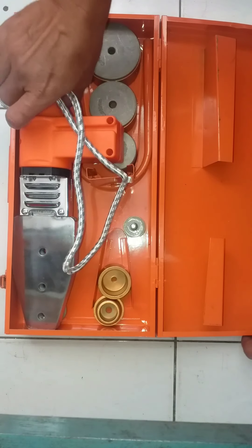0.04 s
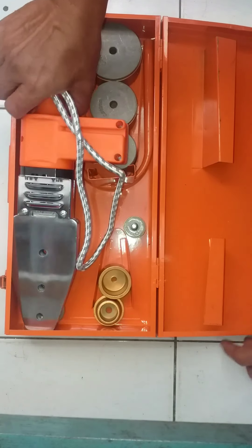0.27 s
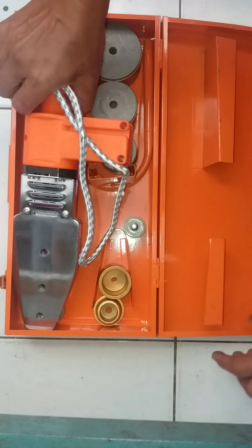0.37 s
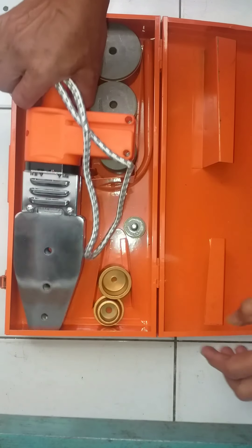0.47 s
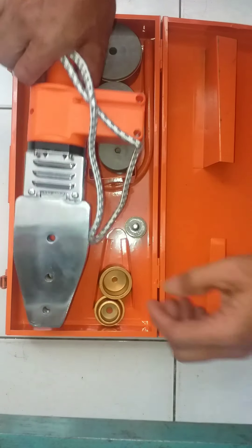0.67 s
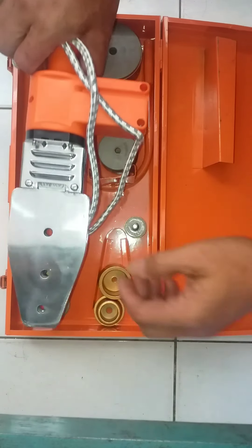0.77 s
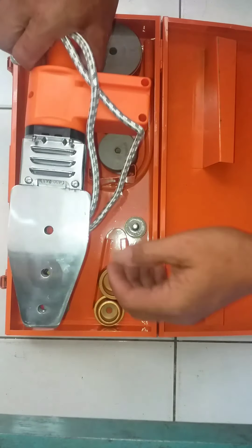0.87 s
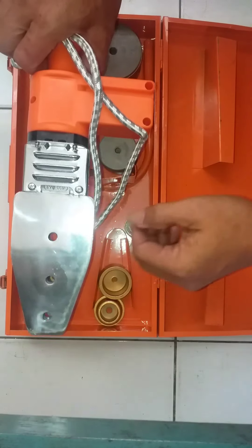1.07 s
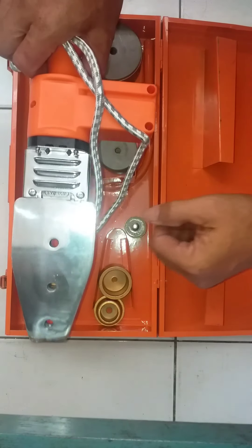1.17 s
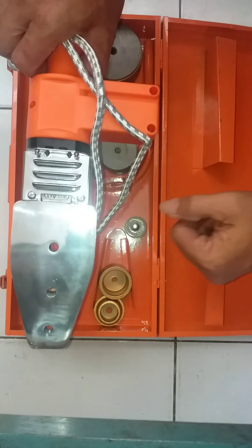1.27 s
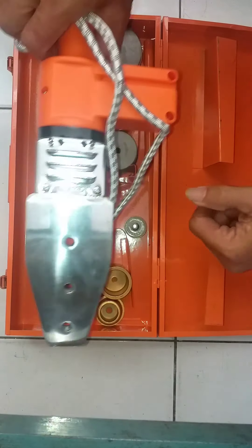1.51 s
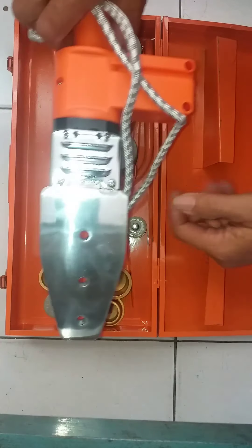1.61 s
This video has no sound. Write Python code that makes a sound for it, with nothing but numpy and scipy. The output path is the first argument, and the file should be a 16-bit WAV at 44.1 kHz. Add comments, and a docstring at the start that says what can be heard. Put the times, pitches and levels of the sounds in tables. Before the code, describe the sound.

Hollow plastic knocks and clatter sound as a metal tool is pulled from its open case in a small tiled room. Small clinks and bumps build to a loud scraping rattle, ending with a light tap over low room noise.

```python
"""A heavy metal tool is lifted out of an open plastic case on a tiled floor, in a small hard room.
Loose metal clinks, the tool bumps the tray, drags against its ribs in a dense clatter and knocks free.
Each knock is a contact crack, the clack of thin panels and the hollow ring of the shell.
A light double tap on the plastic comes last, over a steady low background."""
import sys
import numpy as np
from scipy import signal
from scipy.fft import rfft, irfft
from scipy.io import wavfile
from scipy.ndimage import uniform_filter1d

SR = 44100
rng = np.random.default_rng(int(sys.argv[2]) if len(sys.argv) > 2 else 0)


def pcm_store(signal):
    """Save signal as 16-bit PCM."""
    levels = np.round(np.clip(np.atleast_2d(signal), -1, 1) * 32767)
    wavfile.write(sys.argv[1], SR, levels.astype(np.int16).T)


N = 72765
HIT_SAMPLES = 2 ** 14
PANEL_ATTACK_S, CRACK_ATTACK_S = 0.0025, 0.00024

# knocks of the tool on the case: start_s, clack_db, clack_tilt_db_per_octave, shell_db, crack_db
KNOCKS = [(.1545, -25, 0, -48, -35), (.2265, -35, 5, -32, -21.5), (.2295, -23, -1.5, -34, -46),
          (.2407, -24.5, 3, -57, -25), (.252, -23.5, -4, -33, -34), (.270, -24.5, 3.5, -62, -24),
          (.363, -34, -7, -50, -51), (.4138, -39, 1.5, -38.5, -54), (.440, -34.5, -15, -40.5, -59),
          (0.4605, -19.5, 0.5, -35.5, -47), (.471, -18.5, -1, -30, -53), (0.4935, -18, 1, -32, -41),
          (.515, -19.5, -2, -25, -17), (.5255, -16, 2.5, -23, -19), (.5395, -15, -5, -21, -15),
          (0.5537, -10, -4.5, -24, -12.5), (.559, -17, 0.5, -28, -13.5), (.575, -11, 1.5, -19.5, -22),
          (.589, -15.5, -3, -21.5, -32), (.611, -18, -1, -37, -24), (.620, -15.5, -4, -22, -15),
          (.627, -8.5, 2, -23, -11.5), (.637, -26, -1, -25.5, -32), (.658, -23, -6, -42.5, -49),
          (.685, -34, -3, -39, -45), (.7206, -32, 2, -25, -23.5), (.738, -24, -1, -27.5, -36),
          (.765, -37, -4, -54, -50), (.785, -31.5, -0.5, -57, -45), (.806, -42, -18, -35, -54)]
# tone colour of the crowded panel modes: frequency_hz, level_db
PANEL_COLOUR = [(60, -40), (160, -22), (330, -14.5), (600, -0.5), (950, -0.5), (1600, 1.5), (2600, 2.5),
                (3800, -2), (5500, -5.5), (7500, -12), (10000, -12), (16000, -13)]


def undb(db):
    """Decibels to gain."""
    return 10 ** (np.asarray(db) / 20)


def unit(x):
    """Scale to rms 1."""
    return x / np.sqrt(np.mean(x ** 2))


def along(points, hz):
    """Read a table on a log-frequency axis."""
    frequencies, values = np.array(points, float).T
    return np.interp(np.log(hz + 1), np.log(frequencies), values)


def noise(colour):
    """Steady noise of the given colour, at rms 1."""
    hz = np.fft.rfftfreq(N, 1 / SR)
    return unit(irfft(rfft(rng.standard_normal(N)) * undb(along(colour, hz)), N))


def fade(t, t60):
    """Exponential decay, 60 dB down after t60 seconds."""
    return np.exp(-np.log(1000) * t / t60)


def rise(t, attack_s):
    """Soft onset."""
    return 1 - np.exp(-t / attack_s)


def dense_ring(t, colour, t60):
    """Countless overlapping modes: octave bands of noise, shaped by colour(hz) in dB, dying in t60(hz)."""
    hz = np.fft.rfftfreq(len(t), 1 / SR)
    spectrum = rfft(rng.standard_normal(len(t))) * unit(undb(colour(hz)))
    centres_hz = 125 * 2. ** np.arange(8)
    octave = np.log2(np.clip(hz, centres_hz[0], centres_hz[-1]))
    out = np.zeros(len(t))
    for centre_hz in centres_hz:
        band = np.maximum(1 - abs(octave - np.log2(centre_hz)), 0)
        out += irfft(spectrum * band, len(t)) * fade(t, t60(centre_hz))
    return out


def mode_ring(t, modes):
    """Separate modes struck together, starting at rms 1."""
    out = sum(undb(db) * np.sin(2 * np.pi * (hz * t + rng.random())) * fade(t, t60)
              for hz, db, t60 in modes)
    return out / np.sqrt(sum(undb(db) ** 2 for _, db, _ in modes) / 2)


def add(out, start_s, x):
    """Mix a sound in at its time."""
    i = int(start_s * SR)
    out[i:i + len(x)] += x[:N - i]


def background():
    """A steady bed of room tone, strongest in the bass."""
    # tone colour of the bed: frequency_hz, level_db
    air_colour = [(25, -41), (65, -6), (107, -2.5), (165, -0.5), (240, -12.5), (295, -3.5), (371, -12),
                  (450, -12.5), (800, -14.5), (1200, -19), (2000, -28), (4000, -27.5), (7500, -31),
                  (10000, -32.5), (16000, -34)]
    return undb(-42.5) * noise(air_colour)


def tool_slide():
    """The tool rubs along the tray: a swelling scrape in the colour of the panels."""
    # level curve of the rubbing: time_s, level_db
    swell = [(0, -49), (.13, -48), (.22, -40), (.35, -58), (.45, -42), (.56, -19.5), (.68, -60),
             (.8, -37.5), (.88, -54.5), (1.1, -51.5), (1.65, -52.5)]
    time_s, level_db = np.array(swell).T
    return noise(PANEL_COLOUR) * undb(np.interp(np.arange(N) / SR, time_s, level_db))


def metal_clinks():
    """Loose metal clinks, each with its own brightness, over a faint lingering ring."""
    # touches of loose metal: start_s, level_db, brightest_hz
    clinks = [(.1505, -24, 7600), (0.1537, -25, 4930), (.275, -33, 4200), (.364, -38, 5400),
              (.382, -37.5, 3280)]
    # modes of the metal: pitch_hz, level_db, t60_s
    metal_modes = [(770, -4, 0.27), (1277, -3, .3), (1852, -18, 0.38), (3220, 3, 0.033),
                   (4010, -0.5, 0.081), (4430, -21, 0.049), (5300, 1.5, 0.04), (5733, -19, 0.14),
                   (6800, -17, 0.041), (7138, -16, 0.04), (6990, -1, 0.018), (7800, -1, .015),
                   (10120, 6, 0.025)]
    ring_hz, ring_t60_s = 1852, .9
    out = undb(-52.5) * mode_ring(np.arange(N) / SR, [(ring_hz, 0, ring_t60_s)])
    t = np.arange(HIT_SAMPLES) / SR
    for start, db, bright_hz in clinks:
        # modes fall 10 dB per octave on either side of the brightest pitch; the click is narrower
        modes = [(hz, level - 10 * abs(np.log2(hz / bright_hz)), t60) for hz, level, t60 in metal_modes]
        click = dense_ring(t, lambda hz: -10 * abs(np.log2((hz + 1) / bright_hz)) / .7, t60=lambda hz: .03)
        clink = mode_ring(t, modes) + undb(-5) * click
        add(out, start, undb(db) * clink * rise(t, CRACK_ATTACK_S))
    return out


def panel_knocks():
    """Every knock cracks at the contact and sets the thin panels clacking, their highs dying sooner."""
    # tone colour of the contact crack: frequency_hz, level_db
    crack_colour = [(100, -36), (1500, -39), (4000, -9), (7500, 1.5), (10000, -1), (16000, 1.5)]
    out, t = np.zeros(N), np.arange(HIT_SAMPLES) / SR
    for start, clack_db, tilt, _, crack_db in KNOCKS:
        clack = dense_ring(t, lambda hz: along(PANEL_COLOUR, hz) + tilt * np.log2(np.clip(hz, 300, 7000)),
                           t60=lambda hz: 0.15 * (1000 / hz) ** 0.11)
        crack = dense_ring(t, lambda hz: along(crack_colour, hz), t60=lambda hz: 0.079)
        add(out, start, undb(clack_db) * clack * rise(t, PANEL_ATTACK_S))
        add(out, start, undb(crack_db) * crack * rise(t, CRACK_ATTACK_S))
    return out


def shell_ring():
    """The hollow shell rings on after a knock, a little differently wherever the tool presses."""
    # modes of the hollow shell: pitch_hz, level_db
    shell_modes = [(290, -13.5), (375, -12.5), (422, -6.5), (490, -3), (562, -6), (642, 2), (668, -2.5),
                   (748, -3.5), (842, -0.5), (964, -5.5), (1166, -7), (1225, -10), (1315, -9.5),
                   (1850, -6.5)]
    detune, scatter_db, t60_s = .005, 2, .28
    out, t = np.zeros(N), np.arange(HIT_SAMPLES) / SR
    for start, _, _, shell_db, _ in KNOCKS:
        modes = [(hz * rng.normal(1, detune), rng.normal(db, scatter_db), t60_s) for hz, db in shell_modes]
        add(out, start, undb(shell_db) * mode_ring(t, modes) * rise(t, attack_s=0.0038))
    return out


def tray_bumps():
    """Soft, heavy contacts flex the tray and stir only its low modes."""
    # blunt bumps of the tool's weight on the tray: start_s, level_db, centre_hz
    bumps = [(.226, -27.5, 567), (.248, -25.5, 697), (.522, -52, 540), (0.529, -33.5, 179),
             (.554, -16.5, 1080), (.578, -30.5, 215), (.718, -26.5, 324), (.720, -19.5, 582),
             (0.749, -28, 410), (.804, -27.5, 650)]
    width_octaves = .35
    out, t = np.zeros(N), np.arange(HIT_SAMPLES) / SR
    for start, db, centre_hz in bumps:
        thud = dense_ring(t, lambda hz: -10 * (np.log2((hz + 1) / centre_hz) / width_octaves) ** 2,
                          t60=lambda hz: .13)
        add(out, start, undb(db) * thud * rise(t, attack_s=.002))
    return out


def plastic_taps():
    """A last light double tap on the plastic, with neither crack nor body."""
    # the two touches: start_s, level_db
    taps = [(0.945, -28), (.954, -26.5)]
    # tone colour of a tap: frequency_hz, level_db
    tap_colour = [(300, -31), (1100, -10), (1650, 2), (2700, 1), (4200, -1.5), (5500, -12.5), (7500, -14),
                  (10000, -22), (16000, -28)]
    out, t = np.zeros(N), np.arange(HIT_SAMPLES // 2) / SR
    for start, db in taps:
        tap = dense_ring(t, lambda hz: along(tap_colour, hz), t60=lambda hz: 0.069)
        add(out, start, undb(db) * tap * rise(t, PANEL_ATTACK_S))
    return out


def room_reverb(send):
    """Diffuse echo from tiles and walls, even in colour."""
    # decay of the room: frequency_hz, t60_s
    decay = [(150, 0.6), (600, 0.61), (2500, 0.59), (6000, 0.41), (14000, 0.38)]
    smooth_hz = 300
    t = np.arange(2 ** 15) / SR
    wash = dense_ring(t, np.ones_like, t60=lambda hz: along(decay, hz))
    spectrum = rfft(wash * rise(t, attack_s=0.0034) ** 2)
    # soften the random peaks and dips so the tail adds little colour
    ripple = abs(spectrum) / uniform_filter1d(abs(spectrum), int(smooth_hz * t[-1]))
    tail = irfft(spectrum / np.sqrt(ripple))[:len(t) * 3 // 4]
    return signal.fftconvolve(send, tail / np.sqrt(np.sum(tail ** 2)))[:N]


def scene():
    """Case and tool in the room, the shell drier than the contacts, over the steady background."""
    contacts = tool_slide() + metal_clinks() + panel_knocks() + tray_bumps() + plastic_taps()
    shell = shell_ring()
    reverb = room_reverb(undb(-8) * contacts + undb(-12) * shell)
    return (contacts + shell + reverb + background())[None]


def record(dry):
    """The microphone dulls the top octave, rounds the highest peaks and cuts the top."""
    shelf_hz, shelf_width_hz, shelf_db, top_hz = 8030, 57, -13.5, 16000
    hz = np.fft.rfftfreq(2 * N, 1 / SR)
    shelf = undb(shelf_db * (1 + np.tanh((hz - shelf_hz) / (2 * shelf_width_hz))) / 2)
    dulled = irfft(rfft(dry, 2 * N) * shelf, 2 * N)[:, :N]
    high_cut = signal.ellip(10, .2, 80, top_hz, fs=SR, output="sos")
    return signal.sosfilt(high_cut, np.tanh(dulled))


dry = scene()
out = record(dry)
pcm_store(out)
```